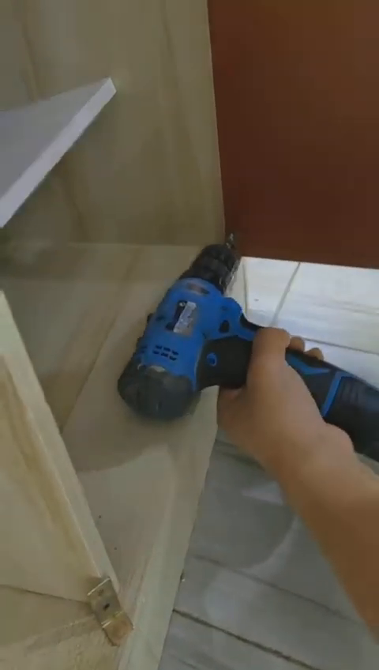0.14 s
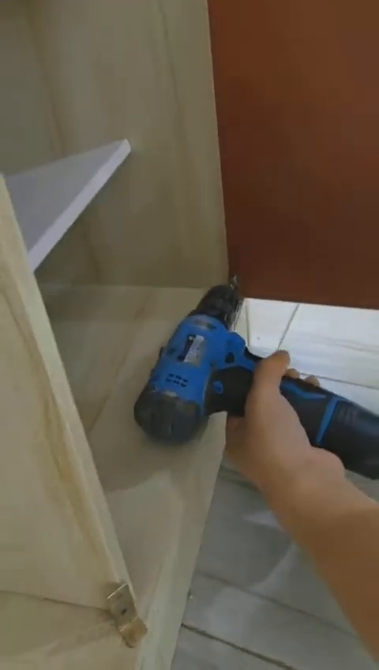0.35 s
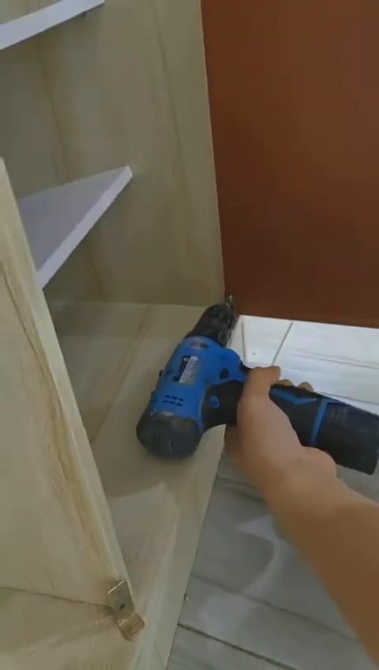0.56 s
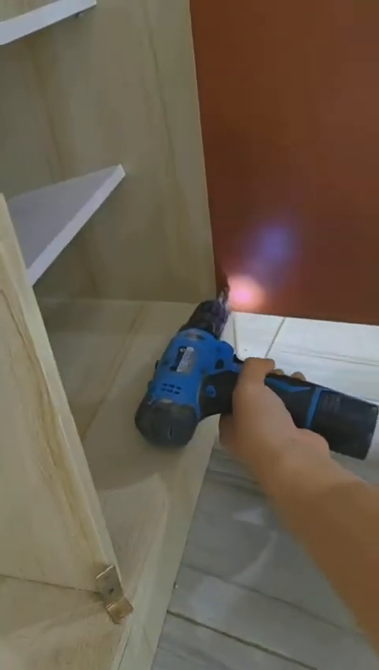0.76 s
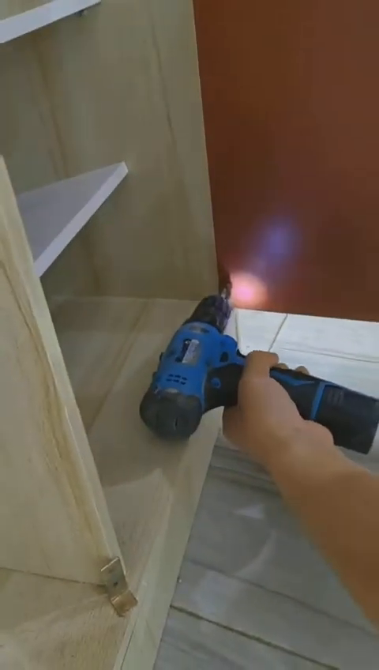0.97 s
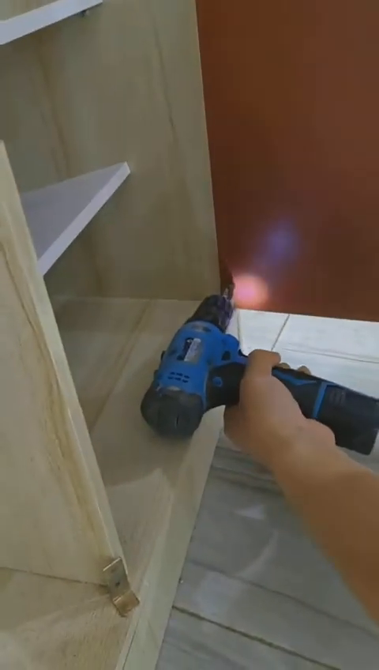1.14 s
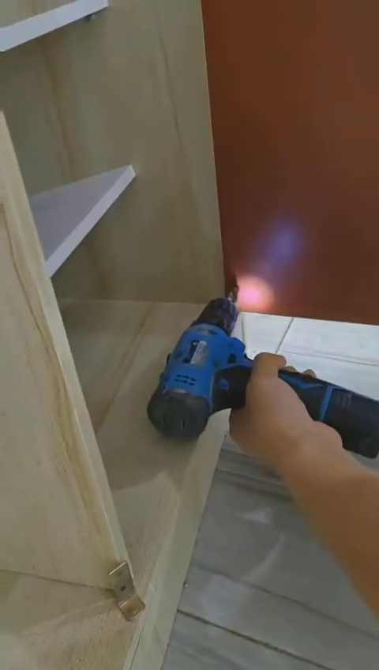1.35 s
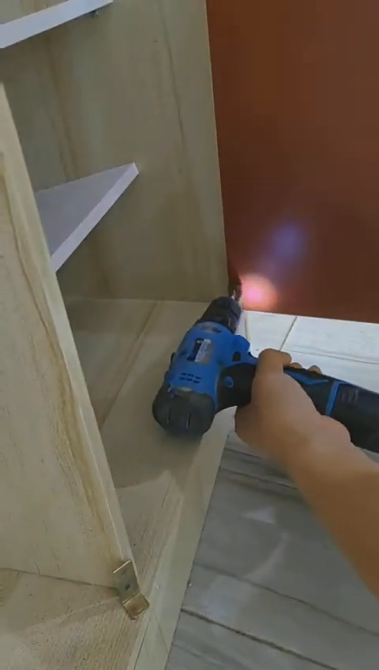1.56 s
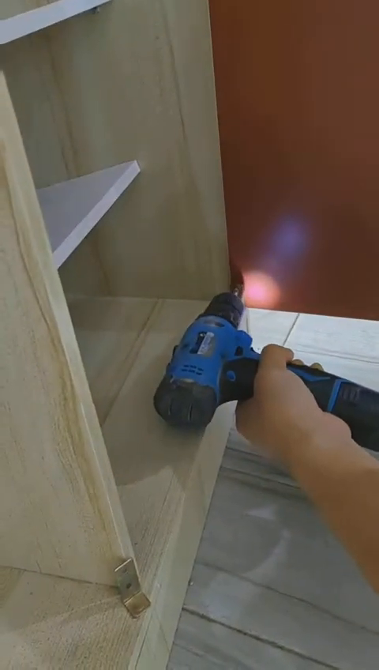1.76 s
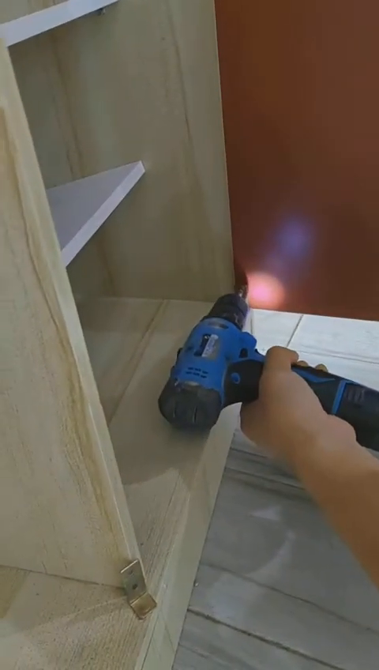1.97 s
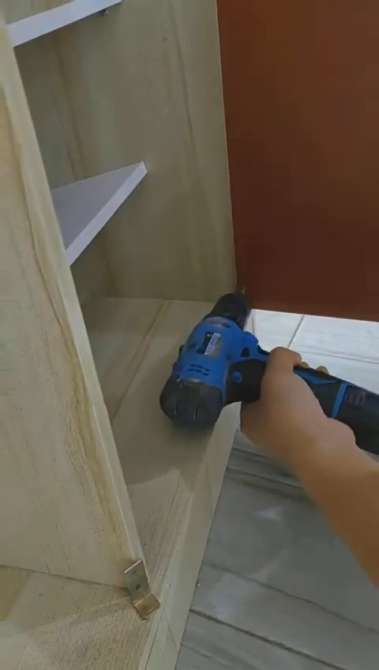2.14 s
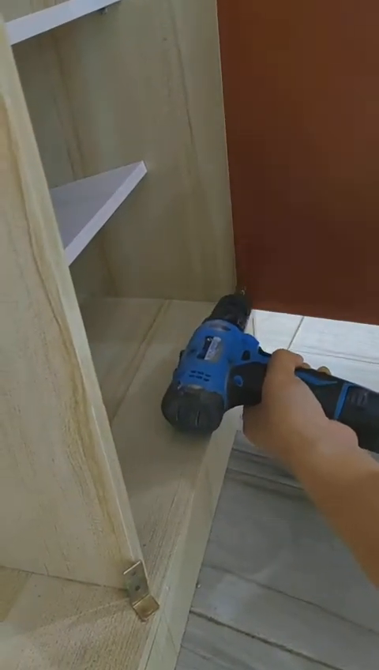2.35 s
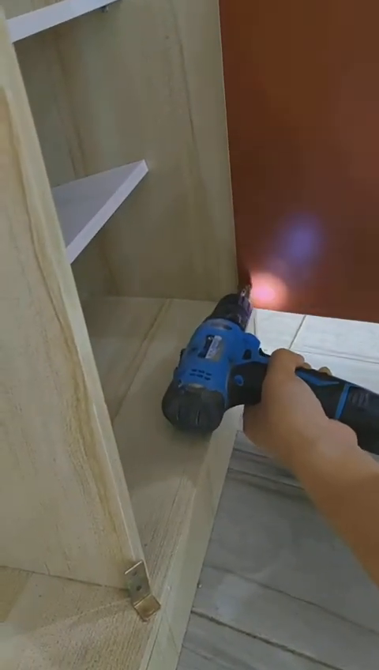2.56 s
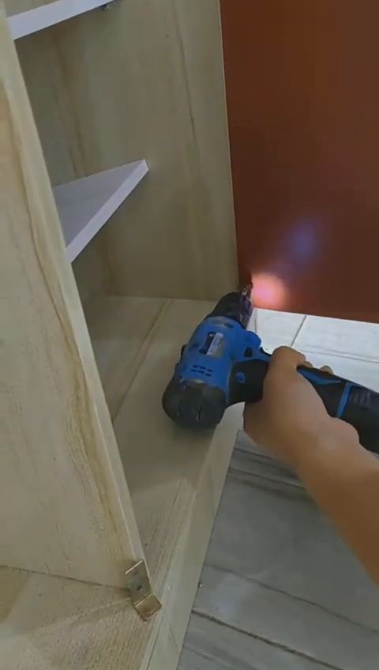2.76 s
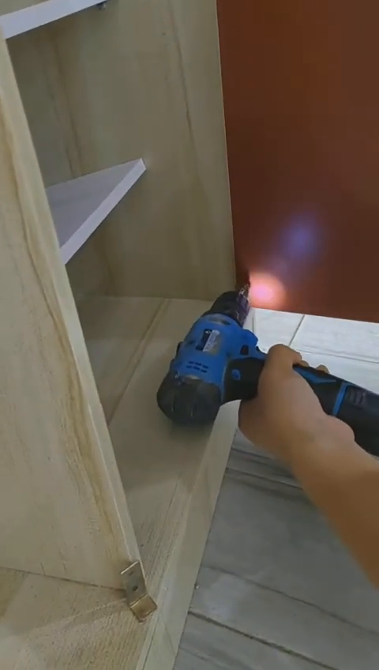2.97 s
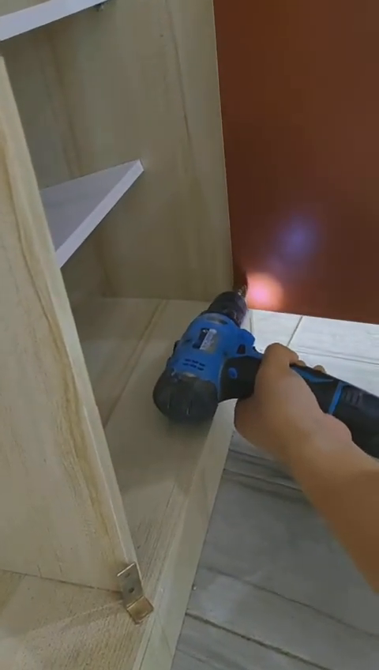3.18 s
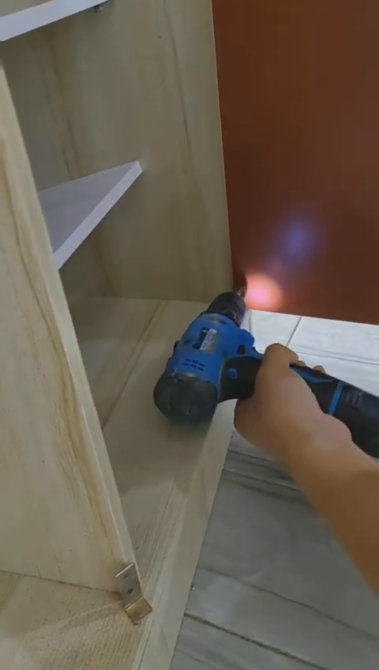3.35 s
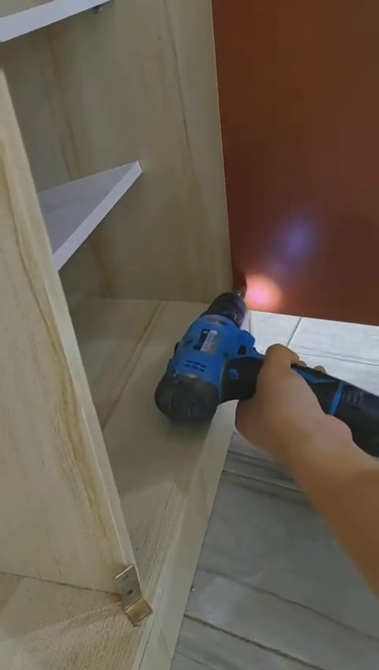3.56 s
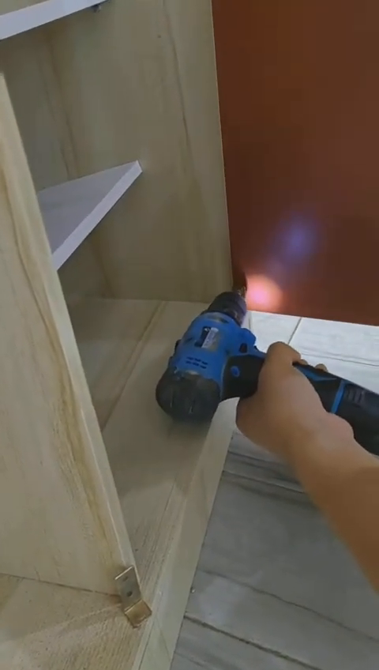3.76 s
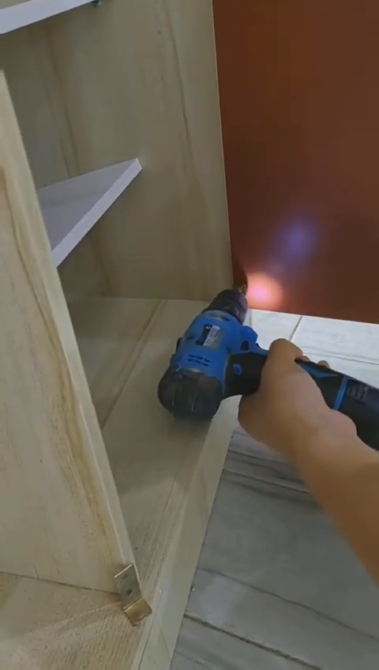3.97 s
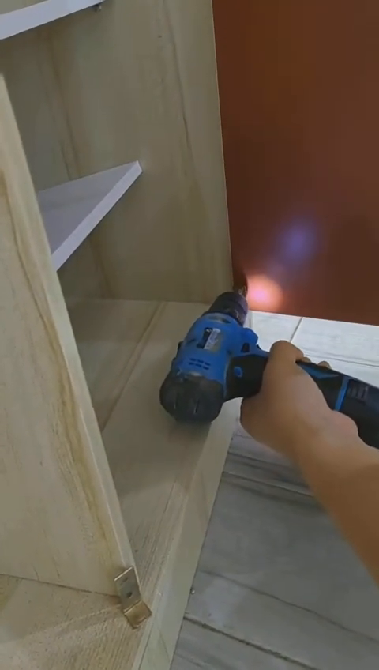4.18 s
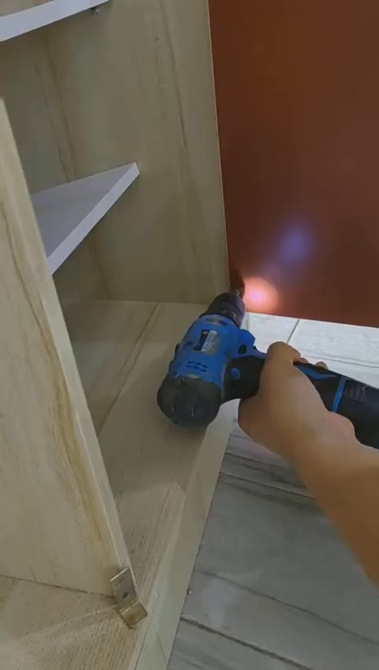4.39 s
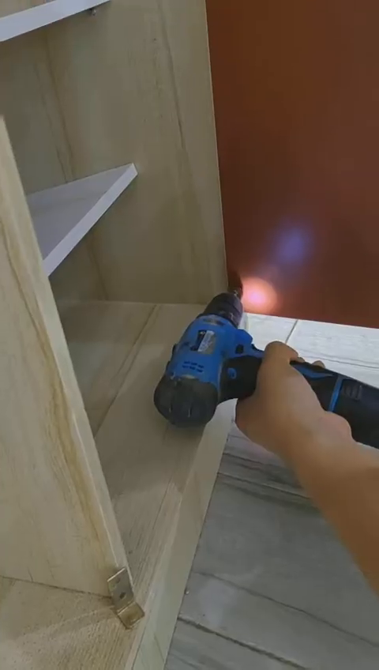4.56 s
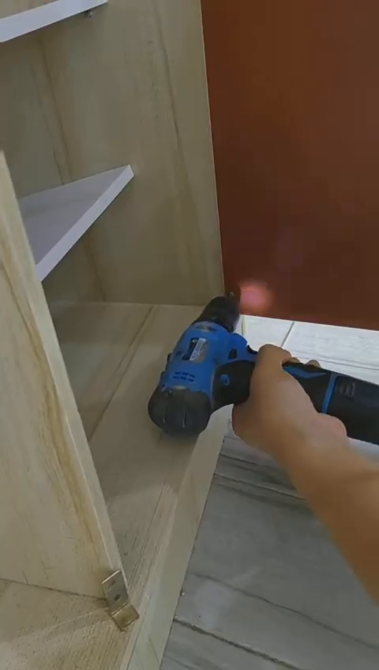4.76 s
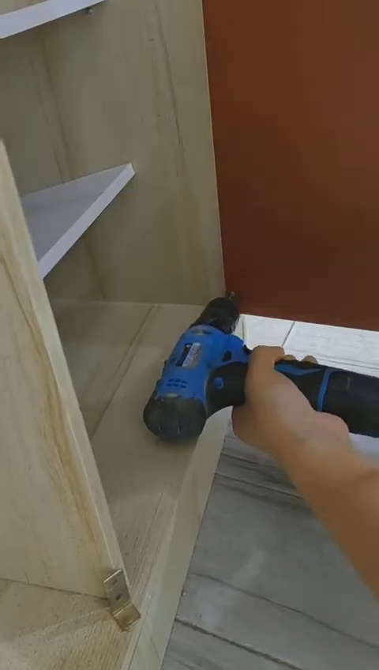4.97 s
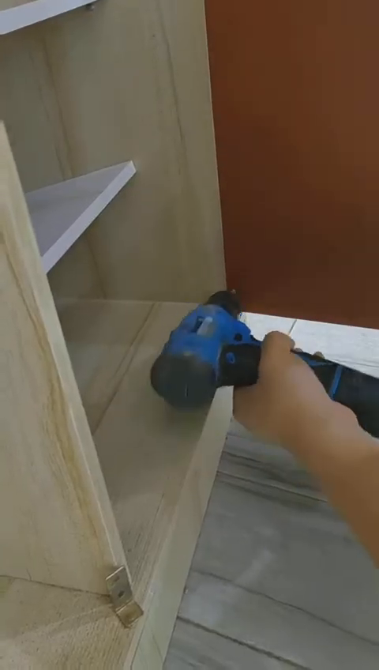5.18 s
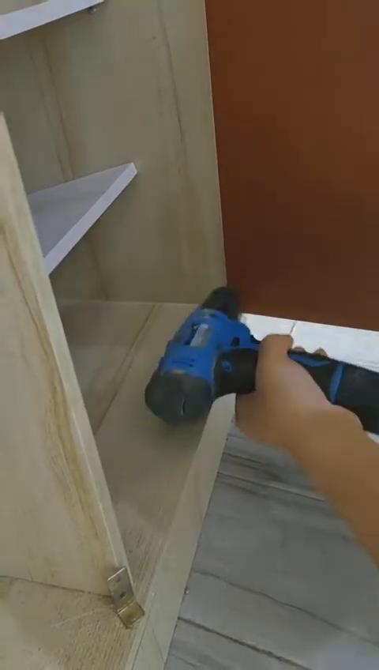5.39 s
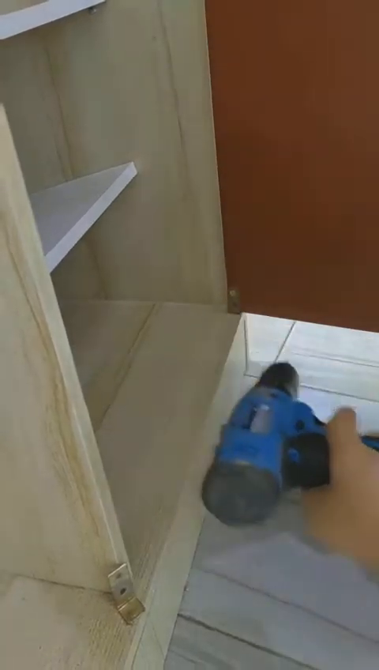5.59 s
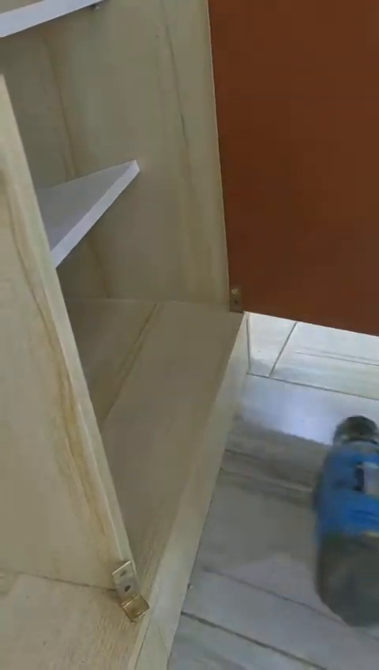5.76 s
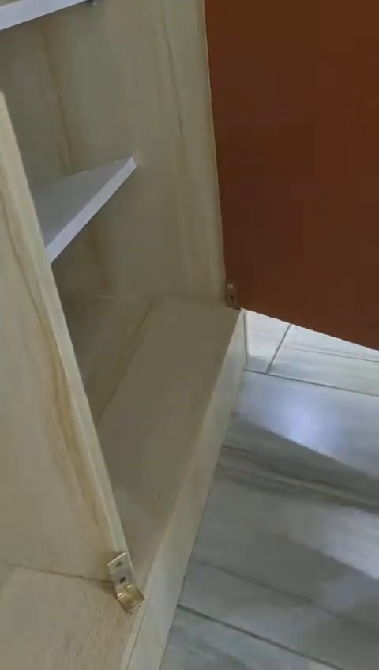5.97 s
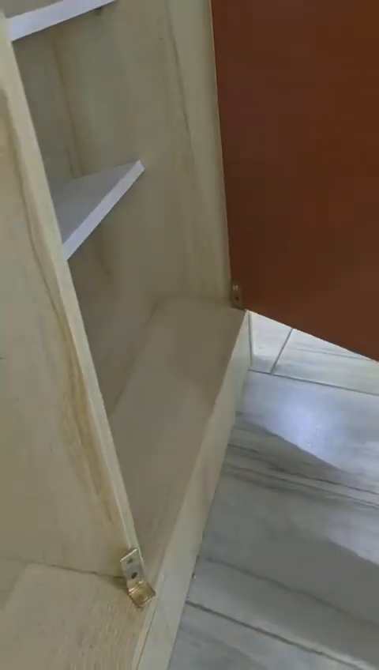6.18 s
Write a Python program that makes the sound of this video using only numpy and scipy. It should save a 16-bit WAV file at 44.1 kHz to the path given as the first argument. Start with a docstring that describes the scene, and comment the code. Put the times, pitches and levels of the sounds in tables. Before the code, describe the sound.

Close up in a small, slightly echoing room, a cordless drill tightens a cabinet hinge screw in two runs, the first short and the second longer. The motor whines, the gears rattle and the wood rumbles and rasps. Soft cloth rustle, bit clicks and a distant clack of boards come first, small clicks fill the pause, and the tool scuffs the wood as it is pulled away.

```python
"""A cordless drill drives a hinge screw into a wooden cabinet in two runs, close to one microphone
in a small hard room. The motor whines, the gear teeth rattle in their housing and the panel rumbles
under the bit. Around the runs the bit clicks in the screw head, the tool bumps and scuffs the
cabinet and a sleeve rustles. Across the room boards clack and knock over the building's low rush."""
import sys
import numpy as np
from scipy import signal
from scipy.fft import rfft, irfft, next_fast_len
from scipy.io import wavfile
from scipy.ndimage import uniform_filter1d, map_coordinates

SR = 44100
rng = np.random.default_rng(int(sys.argv[2]) if len(sys.argv) > 2 else 0)


def inscribe(sig):
    """Save sig as 16-bit PCM at rate SR to the path in sys.argv[1].

    A 1-D sig is mono; a 2-D sig holds one channel per row.
    Samples are clipped to [-1, 1] before scaling.
    """
    pcm = np.round(np.clip(np.atleast_2d(sig).T, -1, 1) * 32767)
    wavfile.write(sys.argv[1], SR, pcm.astype(np.int16))


N = 274743
NOW = np.arange(N) / SR  # scene time, s
AGE = np.arange(SR // 2) / SR  # time since a blow, s


def amp(db):
    """Decibels to gain."""
    return 10 ** (np.asarray(db) / 20)


def unit(x):
    """Scale to rms 1."""
    return x / np.sqrt(np.mean(x ** 2) + 1e-20)


def at_peak(x, db):
    """Scale to a peak of db."""
    return amp(db) * x / np.abs(x).max()


def noise():
    """White noise."""
    return rng.standard_normal(N)


def wobble(rate):
    """A smooth random curve, rate knots a second."""
    return map_coordinates(rng.standard_normal(int(N * rate / SR) + 4), [NOW * rate])


def along(points, hz):
    """Read (pitch_hz, value) points on a log axis."""
    pitches, values = np.transpose(points)
    return np.interp(np.log(hz + 1), np.log(pitches + 1), values)


def filtered(x, response):
    """x through a gain that depends on frequency."""
    size = next_fast_len(N + SR // 2)
    return irfft(rfft(x, size) * response(np.fft.rfftfreq(size, 1 / SR)), size)[:N]


def coloured(x, spectrum):
    """x shaped by a (pitch_hz, level_db) spectrum, at rms 1."""
    return unit(filtered(x, lambda hz: amp(along(spectrum, hz))))


def band(x, hz, width):
    """x through one resonance, at rms 1; width is a share of its frequency."""
    return unit(signal.lfilter(*signal.iirpeak(hz, 1 / width, fs=SR), x))


def patchy(x, depth_db):
    """Shifting contacts feed different narrow bands from moment to moment."""
    spectra = signal.stft(x, nperseg=1024)[2]
    patches = uniform_filter1d(rng.standard_normal(spectra.shape), size=3, axis=0)
    patches = uniform_filter1d(patches, size=12, axis=1)
    return signal.istft(spectra * amp(depth_db * unit(patches)), nperseg=1024)[1][:N]


def dying(t60):
    """A decay of 60 dB in t60 seconds."""
    return np.exp(-np.log(1000) * AGE / t60)


def swell(time, middle_s, half_s):
    """A bell-shaped rise and fall."""
    return np.exp(-((time - middle_s) / half_s) ** 2)


def burst(start_s, rise_s, fall_s):
    """Noise that swells and dies."""
    since = np.maximum(NOW - start_s, 0)
    return noise() * (1 - np.exp(-since / rise_s)) * np.exp(-since / fall_s)


def add(track, start_s, sound):
    """Mix a sound into the track."""
    part = track[round(start_s * SR):][:len(sound)]
    part += sound[:len(part)]


# Echo of the small hard room: pitch_hz, t60_s
ROOM_DECAY = [(100, 0.24), (600, 0.91), (3000, 0.4), (8000, 0.49), (14000, 0.18)]
def room(x, wet_db):
    """Direct sound plus the walls' diffuse tail at the same total power; wetter sounds farther off."""
    hz, t, spectra = signal.stft(rng.standard_normal(SR // 2), SR, nperseg=256)
    decay = np.exp(-np.log(1000) * t / along(ROOM_DECAY, hz)[:, None])
    tail = signal.istft(spectra * decay, SR, nperseg=256)[1]
    echo = signal.fftconvolve(x, tail / np.linalg.norm(tail))[:N]
    return (x + amp(wet_db) * echo) / np.hypot(1, amp(wet_db))


# Room tone, all around the microphone: pitch_hz, relative_db
ROOM_TONE = [(25, -19.5), (52, -27), (75, 0), (115, -4.5), (160, -8), (205, -7), (260, -20), (500, -17),
             (950, -17.5), (1300, -31.5), (2700, -26), (4000, -34), (6400, -40), (7050, -39.5), (8500, -35),
             (10000, -101)]
def building():
    """The low steady rush of the quiet building."""
    drift = amp(.7 * wobble(5))
    return amp(-58.5) * drift * coloured(noise(), ROOM_TONE)


# Colour of the clack across the room: pitch_hz, relative_db
CLACK_SPECTRUM = [(240, -60), (400, -27), (805, -13), (880, 0.5), (1240, -3), (2180, -8.5), (2940, -4.5),
                  (3210, -23.5), (3560, -9), (6650, -19), (8440, -17), (11500, -24), (14000, -40.5)]
# Boards knocked across the room: start_s, relative_db, pitch_hz, width_ratio
FAR_KNOCKS = [(1.1, -36.5, 690, 0.66), (1.138, -35.5, 486, 0.16), (1.237, -44.5, 557, 0.68),
              (1.397, -43, 627, 0.44)]
def far_boards():
    """A hard clack, its brighter second contact and a few dull knocks, far enough off to echo strongly."""
    clack = coloured(burst(.982, rise_s=.0057, fall_s=.016), CLACK_SPECTRUM)
    snap = burst(.9905, rise_s=.00054, fall_s=.0018)
    contacts = at_peak(band(band(snap, 4600, width=.73), 5000, width=1.3), db=-23)
    for start_s, relative_db, pitch_hz, width in FAR_KNOCKS:
        blow = burst(start_s, rise_s=.0022, fall_s=.006)
        knock = band(band(blow, pitch_hz, width), pitch_hz, width=.94)
        contacts += at_peak(knock, relative_db + 6.5)
    return room(at_peak(clack, db=-18.5), wet_db=1.5) + room(contacts, wet_db=-3)


# Colour of the cloth as the arm reaches in and as it pulls back: pitch_hz, relative_db
CLOTH_IN = [(240, -36), (400, -8.5), (515, -4.5), (580, -13), (725, -9.5), (977, -2.5), (1420, -16),
            (2770, -8.5), (4940, -12), (6360, -9.5), (7060, -3.5), (8960, -24), (14000, -35)]
CLOTH_OUT = [(240, -31), (400, -12.5), (770, -9), (900, -5.5), (1690, -13), (2690, -10), (3510, -12.5),
             (4730, -5.5), (5320, -10), (7060, -1), (10600, -25), (14000, -26.5)]
# Sleeve strokes right by the microphone: middle_s, half_length_s, rustle_db, hiss_db, folds_db
SLEEVE_STROKES = [(0.026, 0.052, -63, -62, -74), (0.219, 0.045, -48, -48, -69),
                  (0.319, 0.031, -50.5, -55, -48.5), (0.399, 0.049, -43, -61, -47.5),
                  (0.559, 0.14, -42.5, -40, -60), (1.434, 0.061, -63, -66, -60.5),
                  (5.622, 0.13, -55, -54.5, -63), (5.788, 0.028, -61, -73, -53),
                  (5.84, 0.089, -45, -70, -63), (6.05, 0.12, -44, -60, -56.5)]
def sleeve():
    """Cloth slides over cloth: fibres catch, folds rub, and a thin 7 kHz hiss comes with each rustle."""
    edge, catches_per_s = 1.54, 600  # edge 1 is a pointed swell, 2 a round one
    swells = [np.exp(-np.abs((NOW - s) / half_s) ** edge) for s, half_s, *_ in SLEEVE_STROKES]
    rustle, hissing, rubbing = amp(np.array(SLEEVE_STROKES)[:, 2:]).T @ np.array(swells)
    catches = (rng.random(N) < catches_per_s / SR) * noise()
    fibres = patchy(noise() + .42 * unit(catches), depth_db=1.3)
    last_press_s = TRIGGER_PULLS[-1][0]
    cloth = np.where(NOW < last_press_s, coloured(fibres, CLOTH_IN), coloured(fibres, CLOTH_OUT))
    folds = band(band(noise(), 980, width=.16), 1010, width=.48) * amp(2 * wobble(45))
    thin_hiss = band(band(noise(), 7000, width=.024), 7100, width=.12)
    clumps = amp(.8 * wobble(30) + .8 * wobble(250))
    return clumps * (rustle * cloth + hissing * thin_hiss) + rubbing * folds


# Close scuffs as the drill is placed and pulled back: start_s, relative_db
BODY_SCUFFS = [(.365, -48), (0.904, -51.5), (5.44, -45), (5.49, -44), (5.603, -43), (6.18, -55)]
def scuffs():
    """The plastic body sticks and slips along the board, which answers lower down."""
    strokes = sum(amp(db) * burst(s, rise_s=.0086, fall_s=.071) for s, db in BODY_SCUFFS)
    stick_slip = strokes * amp(1.3 * wobble(150))
    shell = band(band(stick_slip, 1890, width=.65), 2360, width=1)
    board = band(band(stick_slip, 874, width=.13), 970, width=.99)
    return strokes.std() * (shell + amp(-7.5) * board)


# Short ticks close to the microphone: start_s, level_db, pitch_hz
CLOSE_TICKS = [(0.371, -39, 3300), (1.397, -54, 6500), (3.086, -20, 2620), (3.895, -14.5, 3060),
               (5.615, -38, 3050), (6.187, -42.5, 1670)]
def ticks():
    """Light taps of the tool, and gears knocking or catching mid-run."""
    track = np.zeros(N)
    for start_s, level_db, pitch_hz in CLOSE_TICKS:
        blow = burst(start_s, rise_s=.0016, fall_s=.0052)
        track += at_peak(band(band(blow, pitch_hz, width=.6), pitch_hz, width=1.2), level_db)
    return room(track, wet_db=-12.5)


# Slips of the bit at the hinge, close up: start_s, relative_db, pitch_hz, scrape_ratio, thud_db
BIT_SLIPS = [(0.732, -40, 3060, .6, -42), (0.8066, -42, 3630, 1.3, -47), (1.332, -36.5, 2780, 0.61, -40.5),
             (2.508, -39.5, 2830, 0.32, -49), (2.525, -47, 3160, 0.88, -51),
             (2.6037, -57.5, 3220, 0.72, -44), (2.744, -48, 2880, 0.32, -42.5),
             (2.8671, -46.5, 2730, 0.5, -43.5), (5.199, -47, 3160, .8, -47),
             (5.217, -42.5, 3650, 0.81, -42), (5.2967, -40, 3160, 1.2, -62), (5.416, -49, 3240, 0.56, -64)]
def bit_clicks():
    """The bit slips in the screw head: a dry, gritty scrape and a short steel ring."""
    track = np.zeros(N)
    contact = signal.butter(N=5, Wn=[2200, 6500], btype="band", fs=SR, output="sos")
    envelope = (dying(.025) + dying(.09)) * (1 - np.exp(-AGE / .001))
    for start_s, relative_db, pitch_hz, scrape_ratio, _ in BIT_SLIPS:
        grit = rng.standard_normal(len(AGE)) * amp(2 * wobble(350)[:len(AGE)])
        scrape = signal.sosfilt(contact, grit) * envelope
        steel = band(band(scrape, pitch_hz, width=.13), pitch_hz, width=.45)
        add(track, start_s, at_peak(steel + scrape_ratio * unit(scrape), relative_db + 1))
    return room(track, wet_db=-14)


def ring(modes, scatter_db):
    """Damped (pitch_hz, level_db, t60_s) modes, at new strengths for every blow."""
    return sum(amp(db + scatter_db * rng.standard_normal()) * dying(t60) * np.sin(2 * np.pi * hz * AGE)
               for hz, db, t60 in modes)


def radiated(x):
    """A thin panel radiates almost nothing below its lowest mode."""
    return signal.sosfilt(signal.butter(N=7, Wn=74, btype="high", fs=SR, output="sos"), x)


JOG_HZ = 194  # the bit favours the panel's modes around this pitch
# Modes of the cabinet panel in front of the microphone: pitch_hz, relative_db, t60_s
PANEL_MODES = [(85.4, -24.5, .2), (105.7, 4.5, 0.2), (132.7, 9, 0.18), (187.2, 4, 0.12), (199.9, 9, 0.18),
               (228, 0, 0.088), (290, -4.5, 0.063), (414.2, 5, 0.14), (703, -17.5, 0.061)]
def panel_rumble(scatter_db, below_hz=np.inf):
    """A random force keeps the panel's modes ringing."""
    modes = [mode for mode in PANEL_MODES if mode[0] < below_hz]
    return radiated(signal.fftconvolve(noise(), ring(modes, scatter_db))[:N])


# The hand shifts on the drill at the cabinet: start_s, end_s, level_db
GRIP_SHIFTS = [(0.697, 1.003, -54), (1.102, 1.433, -57), (2.207, 2.716, -57.5), (3.665, 4.166, -44.5)]
def grip():
    """A shifting hand keeps the panel rumbling softly through the bit."""
    fade_s = .036
    force = sum(amp(db) * np.clip(np.minimum(NOW - start, end - NOW) / fade_s, 0, 1)
                for start, end, db in GRIP_SHIFTS)
    rumble = band(panel_rumble(scatter_db=0, below_hz=300), JOG_HZ, width=.41)
    return force * unit(rumble * amp(2.4 * wobble(25.36)))


# Bumps on the cabinet, near the microphone: start_s, level_db, favoured_hz
CABINET_BUMPS = [(0.688, -46, 190), (0.867, -37.5, 159), (0.959, -45, 201), (1.1, -39.5, 178),
                 (1.241, -43, 189), (1.53, -37, 190), (1.684, -26.5, 135), (1.746, -20.5, 106),
                 (2.313, -35, 190), (2.435, -53, 240), (2.558, -43, 132.6), (3.084, -29, 288),
                 (5.18, -37.5, 121), (5.21, -46.5, 286), (5.301, -45.5, 100)]
def bumps():
    """Tool and slipping bit jog the panel: each spot favours some modes, harder blows wake more."""
    track = np.zeros(N)
    jogs = [(start_s, thud_db, JOG_HZ) for start_s, *_, thud_db in BIT_SLIPS]
    for start_s, level_db, favoured_hz in CABINET_BUMPS + jogs:
        loss_db_per_octave = 14 / (1 + amp(level_db + 23))
        modes = [(hz, db - loss_db_per_octave * abs(np.log2(hz / favoured_hz)), t60)
                 for hz, db, t60 in PANEL_MODES]
        thud = ring(modes, scatter_db=2) * (1 - np.exp(-AGE / .0037))
        add(track, start_s, at_peak(thud, level_db))
    return room(radiated(track), wet_db=-13)


def binding(binds_s, released_s):
    """How far the screw has tightened during a pull, 0 to 1."""
    return np.clip((NOW - binds_s) / (released_s - binds_s), 0, 1)


def running(age, stop_s):
    """Attack, hold and release of what the motor drives."""
    attack_s, release_db_per_s = .028, 289.5
    return (1 - np.exp(-age / attack_s)) * amp(-release_db_per_s * np.maximum(NOW - stop_s, 0))


def motor(pressed_s, binds_s, released_s, lost_hz):
    """The shaft kicks off, levels out, sags as the screw binds and is braked on release."""
    kick_hz, free_hz, spin_up_s, brake_hz_per_s = 90, 331, .083, 1900
    age = np.maximum(NOW - pressed_s, 0)
    sag_hz = lost_hz * np.sin(np.pi / 2 * binding(binds_s, released_s)) ** 2
    unloaded_hz = free_hz - (free_hz - kick_hz) * np.exp(-(age / spin_up_s) ** 1.25)
    braked_hz = brake_hz_per_s * np.maximum(NOW - released_s, 0)
    return age, sag_hz, np.maximum(unloaded_hz - sag_hz - braked_hz, kick_hz)


def screw():
    """The screw shakes the panel, splits the wood fibres once, and rasps and groans as it tightens."""
    turning, rasping, straining = np.zeros((3, N))
    for pressed_s, binds_s, released_s, lost_hz in TRIGGER_PULLS:
        age, sag_hz, _ = motor(pressed_s, binds_s, released_s, lost_hz)
        tightness = np.sqrt(sag_hz / lost_hz)
        drive = running(age, released_s + .03)
        turning += drive
        rasping += drive * amp(9.5 * tightness)
        straining += running(age, released_s + .097) * tightness ** 2
    rumble = unit(panel_rumble(scatter_db=1.5)) * amp(2.5 * wobble(13))
    groan = band(band(noise(), 131, width=.38), 108, width=.37)
    rasp = band(band(noise() * amp(1.6 * wobble(90)), 647, width=.49), 575, width=1)
    split = burst(1.735, rise_s=.0035, fall_s=.033)
    crack = band(band(split, 390, width=.77), 700, width=.99)
    return (amp(-49) * turning * rumble + amp(-46) * straining * groan
            + amp(-52.5) * rasping * rasp + at_peak(crack, db=-25))


# Broad colour of the gearbox, close up: pitch_hz, relative_db
GEARBOX_SPECTRUM = [(180, -45.5), (300, -18), (502, -28), (649, -21), (826, -19), (955, -11), (1450, -10),
                    (2990, -2), (3800, -3), (8100, -4), (9370, -14), (14000, -21.5)]
def coasting(hz):
    """Gears that carry no force rattle dully and leave the shell silent."""
    return amp(along(GEARBOX_SPECTRUM, hz)) / np.hypot(1, hz / 6500)


def unwinding():
    """Once the screw is tight, the strained gears slide back with a faint, dull rattle."""
    last_release_s = TRIGGER_PULLS[-1][2]
    return amp(-58) * swell(NOW, last_release_s + .16, half_s=.067) * unit(filtered(noise(), coasting))


# Resonances of the housing and chuck, close up: pitch_hz, width_hz, free_db, loaded_db
SHELL_MODES = [(650, 46, 0, 6), (884, 87, -1, -1), (1282, 27, 0.5, -1.5), (1660, 30, -1.5, -3),
               (2080, 110, -9, -7.5), (2705, 80, -7.5, -5.5), (2980, 170, -5.5, -8), (3030, 70, -10, -6),
               (3210, 150, -7.5, -10), (3950, 98, -4.5, -5), (4300, 90, -6, -6), (5700, 200, -18.5, -2.5),
               (6880, 97, -14, -3.5), (7240, 190, -11, -13.5), (8410, 180, -9.5, -4)]
def housing(hz, loaded):
    """The shell's resonances on top of the gearbox colour, running free or loaded."""
    peaks = sum(amp(loaded_db if loaded else free_db) ** 2 / (1 + (2 * (hz - pitch_hz) / width_hz) ** 2)
                for pitch_hz, width_hz, free_db, loaded_db in SHELL_MODES)
    # a narrow dip near 3.8 kHz is heard in the rattle during the loaded stretch
    dip = 1 - loaded * .55 / (1 + ((hz - 3820) / 110) ** 2)
    return amp(along(GEARBOX_SPECTRUM, hz)) * np.sqrt(.21 + peaks) * dip


def gear_rattle(turns, sag_hz, driven):
    """Twelve pinion teeth strike each turn, each with its own force, over a bed of sliding noise."""
    teeth = np.diff(np.floor(12 * turns + .25 * wobble(2500)), prepend=0)
    strikes = unit(teeth * noise()) + 2.8 * noise()
    # the play in the gears opens and closes twice a turn, and the teeth grind in uneven clumps
    play = (1 + .06 * np.sin(4 * np.pi * turns)) * amp(.3 * wobble(30) + .45 * wobble(170))
    strikes = patchy(strikes * play, depth_db=2.3)
    # torque shifts the rattle to other resonances, fully so at 16 Hz of lost speed
    load = np.clip(sag_hz / 16, 0, 1)
    free = unit(filtered(strikes, lambda hz: housing(hz, loaded=False)))
    loaded = unit(filtered(strikes, lambda hz: housing(hz, loaded=True)))
    dull = unit(filtered(strikes, coasting))
    return driven * ((1 - load) * free + load * loaded) + (1 - driven) * dull


# Rotor and gear-mesh tones, close up: shaft_multiple, over_rattle_db, loudest_shaft_hz, half_width_hz
SHAFT_ORDERS = [(3, -22, 325, 60), (9, -7, 326.5, 4), (9.8, -7.5, 313.5, 6), (12, -10.3, 331, 10),
                (19.6, -16, 308, 3), (22, -15, 312, 4)]
def motor_whine(turns, shaft_hz):
    """Each multiple of the shaft speed swells as it crosses a resonance."""
    whine = np.zeros(N)
    for multiple, db, loudest_hz, half_width_hz in SHAFT_ORDERS:
        level = amp(db + 1.2 * wobble(18)) / (1 + ((shaft_hz - loudest_hz) / half_width_hz) ** 2)
        whine += level * np.sin(2 * np.pi * multiple * turns + .18 * wobble(60))
    return whine


def rotor(turns, age, growl_level):
    """Heavy current makes the three-pole rotor sing as it gathers speed, and growl roughly."""
    phase = 2 * np.pi * 3 * turns
    song_level = amp(-45.5) * swell(age, .095, half_s=.07) * (age > 0) * amp(2.5 * wobble(110))
    song = song_level * np.sin(phase + .9 * wobble(220))
    return song + growl_level * np.sin(phase + 1.2 * wobble(300))


# The two runs at the hinge: pressed_s, binds_s, released_s, lost_hz (shaft speed lost to the screw)
TRIGGER_PULLS = [(1.525, 1.97, 2.157, 15), (3.043, 3.55, 4.845, 29)]
# Each run, close to the microphone: rattle_db, tight_loss_db, start_growl_db, brake_growl_db, run_on_s
RUN_SOUNDS = [(-25, 2, -38, -29.5, 0.037), (-24.5, 4.5, -37.5, -57, 0.0027)]
def drill(pull, rattle_db, tight_loss_db, start_growl_db, brake_growl_db, run_on_s):
    """One pull of the trigger: gears rattle, the motor whines and growls as it starts and brakes."""
    _, binds_s, released_s, _ = pull
    age, sag_hz, shaft_hz = motor(*pull)
    turns = np.cumsum(shaft_hz * (1 + .0008 * wobble(35))) / SR
    driven = np.exp(-np.maximum(NOW - released_s, 0) / .025)
    rattle = gear_rattle(turns, sag_hz, driven)
    whine = motor_whine(turns, shaft_hz)
    starting = swell(age, .046, half_s=.016)
    braking = swell(NOW, released_s + .04, half_s=.02)
    growl_level = amp(start_growl_db) * starting * (age > 0) + amp(brake_growl_db) * braking
    slack_db = 4 * starting  # a flare as the slack is taken up
    slow_db = 4.5 * np.exp(-age / .13)  # weaker while gathering speed
    tight_db = tight_loss_db * binding(binds_s, released_s) ** 3
    effort = amp(rattle_db + slack_db - slow_db - tight_db) * running(age, released_s + run_on_s)
    return room(effort * rattle + rotor(turns, age, growl_level), wet_db=-21) + effort * driven * whine


def scene():
    """Everything reaches one microphone by the cabinet, the same in both channels."""
    runs = sum(drill(pull, *sound) for pull, sound in zip(TRIGGER_PULLS, RUN_SOUNDS))
    at_cabinet = runs + unwinding() + screw() + bumps() + grip() + bit_clicks() + ticks()
    mono = at_cabinet + far_boards() + sleeve() + scuffs() + building()
    return np.array([mono, mono])


def record(dry):
    """The recorder keeps nothing above its band limit."""
    top_hz, fade_hz = 14250, 400
    return np.array([filtered(x, lambda hz: np.clip((top_hz - hz) / fade_hz, 0, 1) ** 2) for x in dry])


dry = scene()
out = record(dry)
inscribe(out)
```